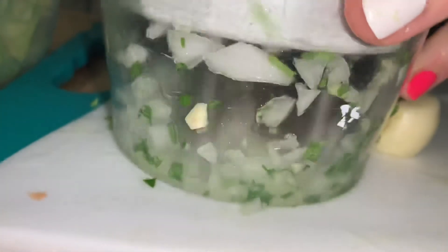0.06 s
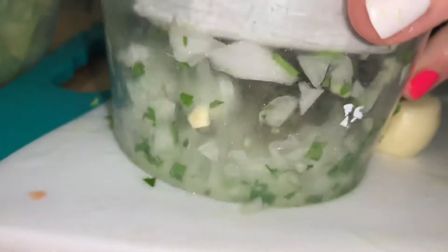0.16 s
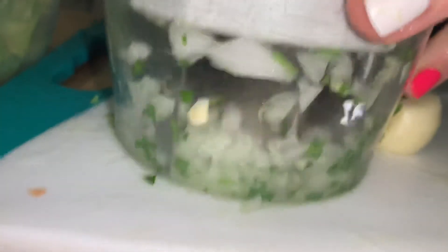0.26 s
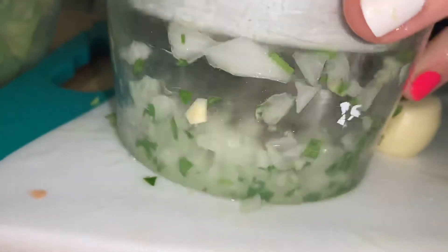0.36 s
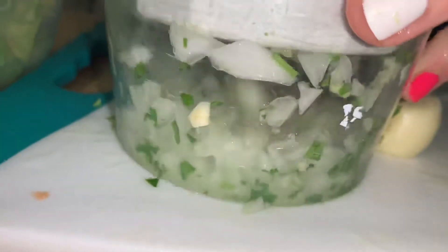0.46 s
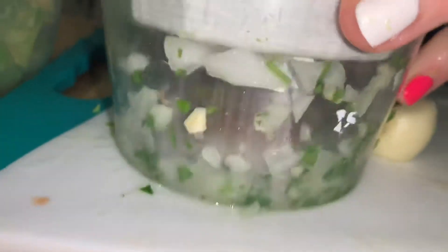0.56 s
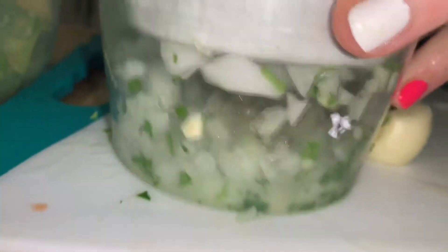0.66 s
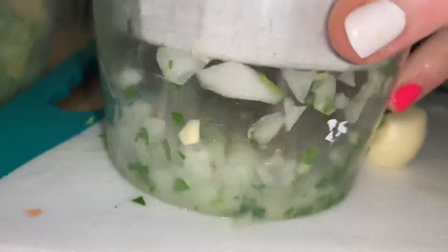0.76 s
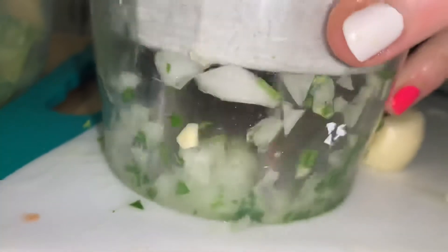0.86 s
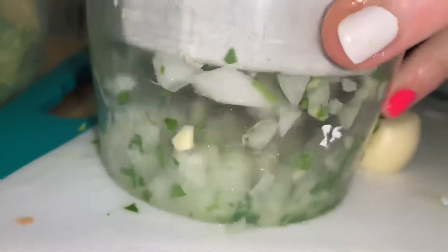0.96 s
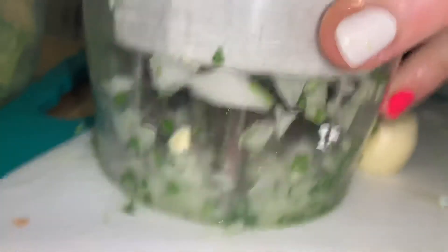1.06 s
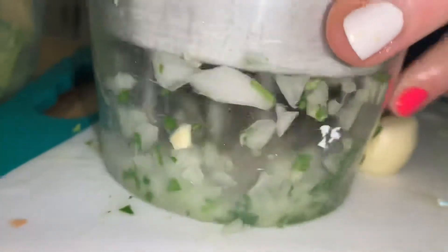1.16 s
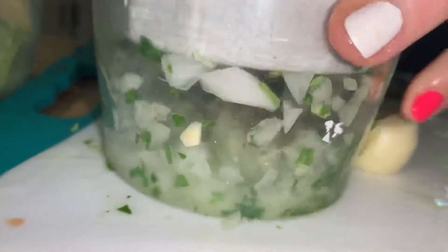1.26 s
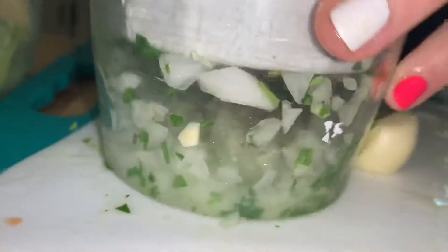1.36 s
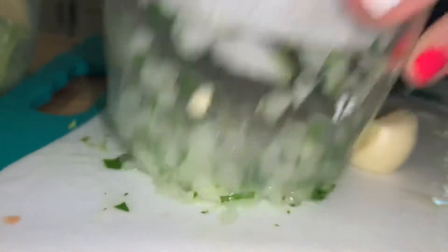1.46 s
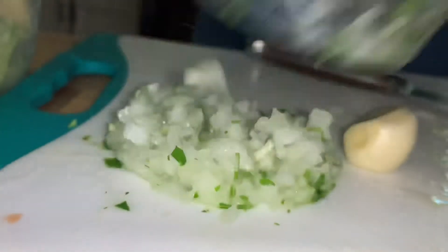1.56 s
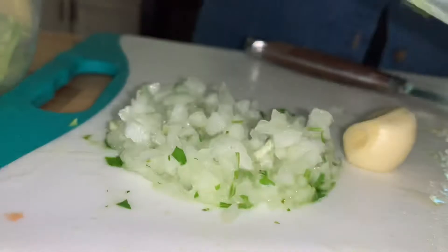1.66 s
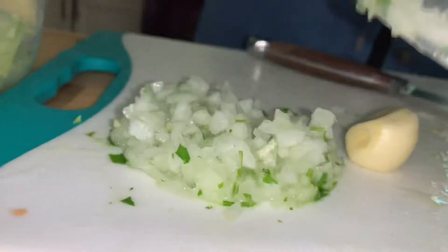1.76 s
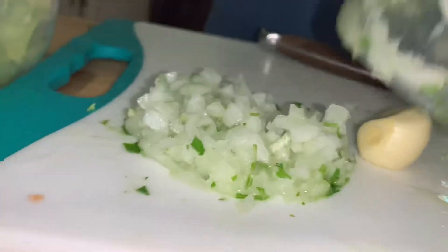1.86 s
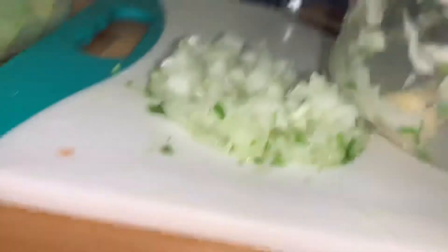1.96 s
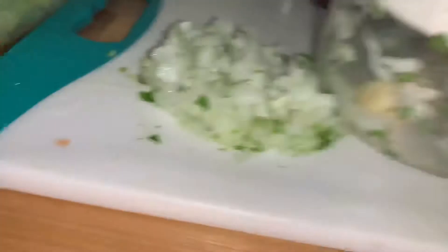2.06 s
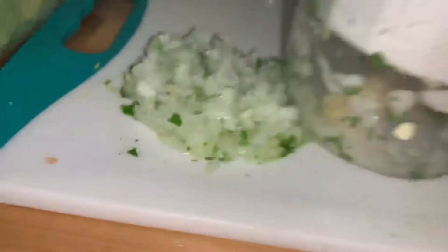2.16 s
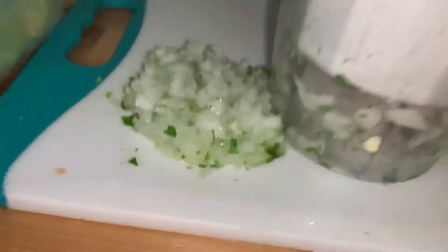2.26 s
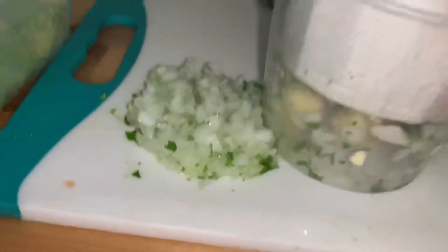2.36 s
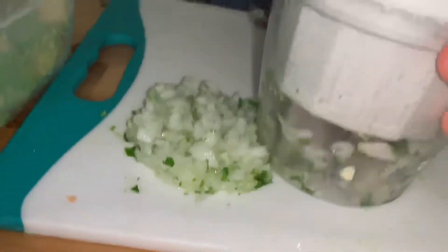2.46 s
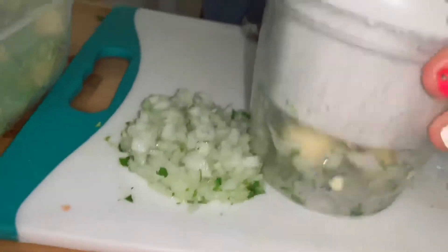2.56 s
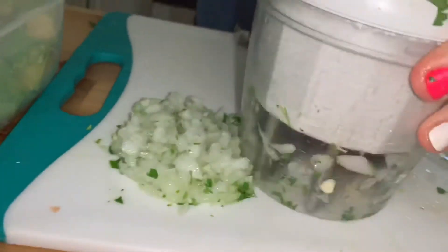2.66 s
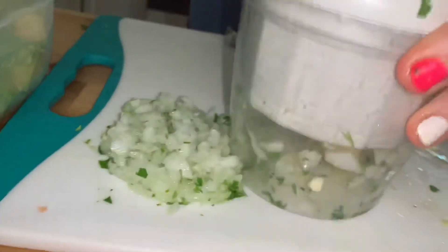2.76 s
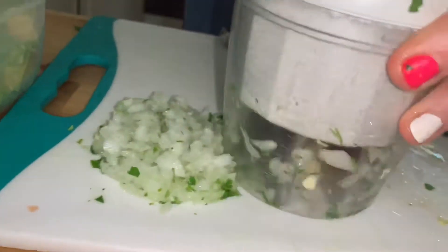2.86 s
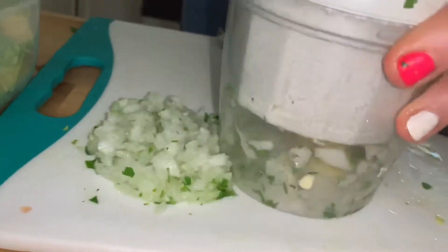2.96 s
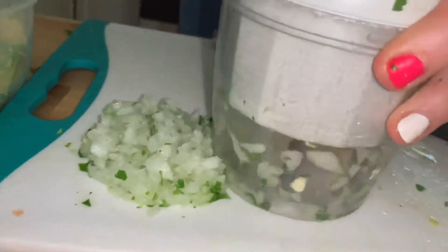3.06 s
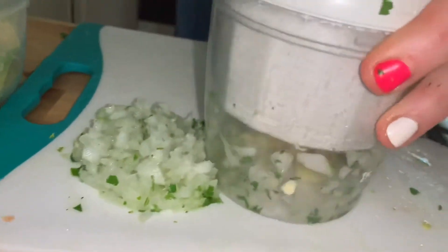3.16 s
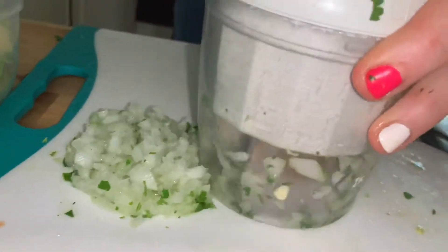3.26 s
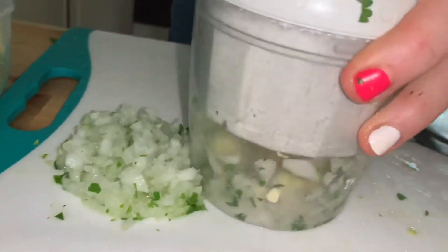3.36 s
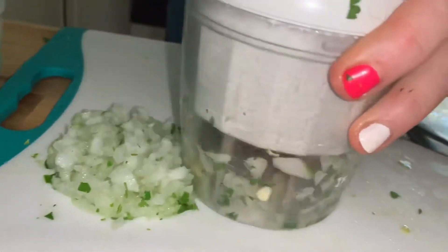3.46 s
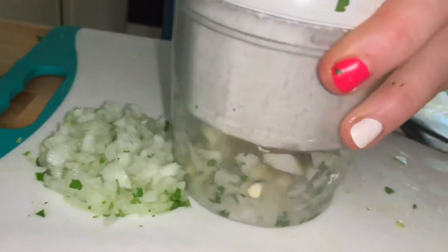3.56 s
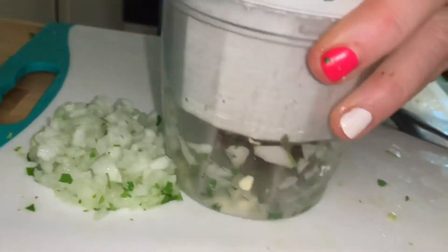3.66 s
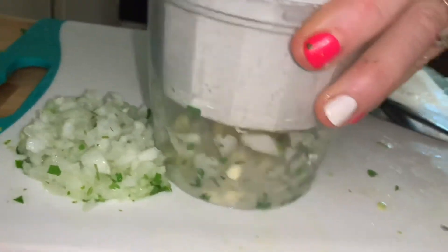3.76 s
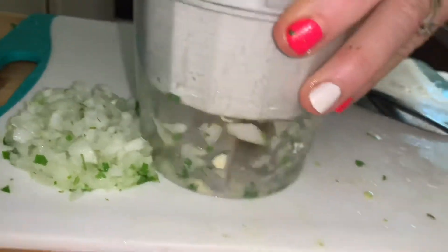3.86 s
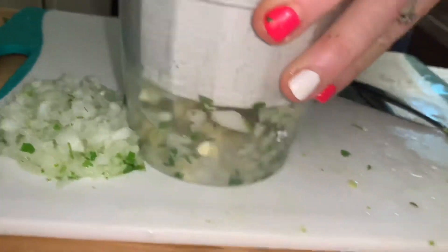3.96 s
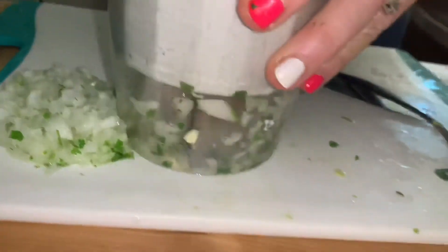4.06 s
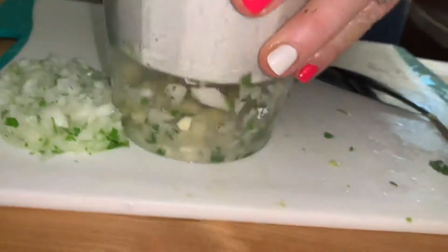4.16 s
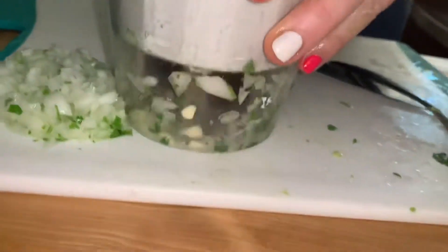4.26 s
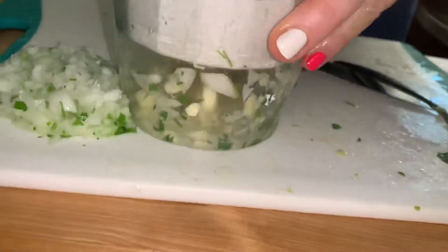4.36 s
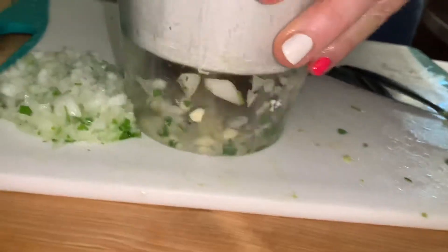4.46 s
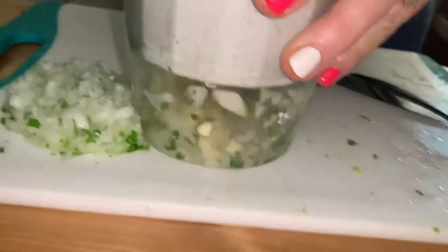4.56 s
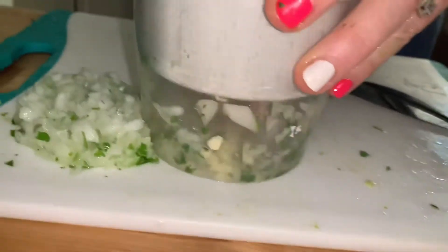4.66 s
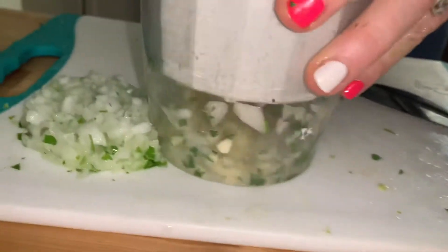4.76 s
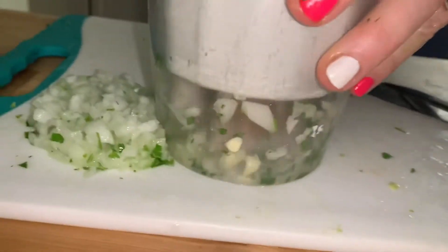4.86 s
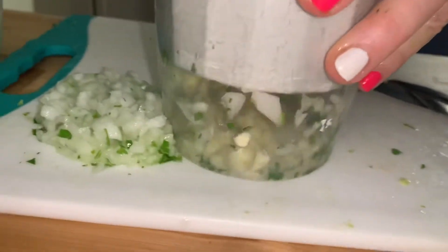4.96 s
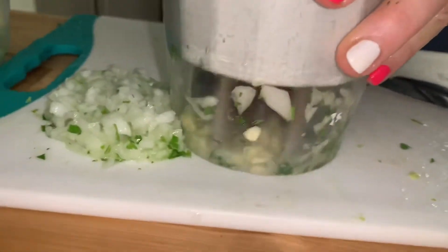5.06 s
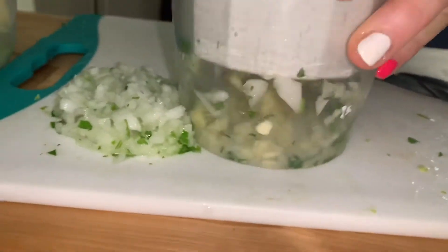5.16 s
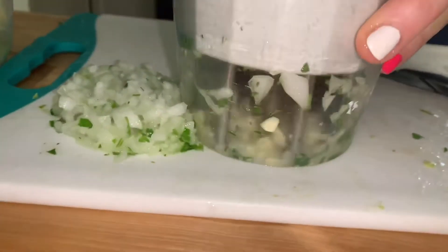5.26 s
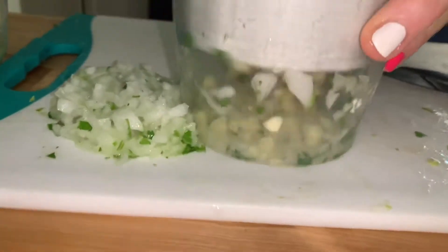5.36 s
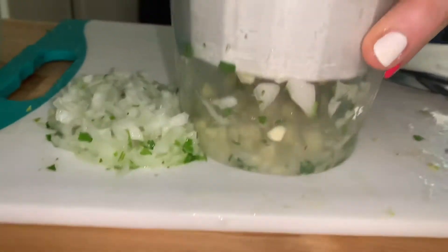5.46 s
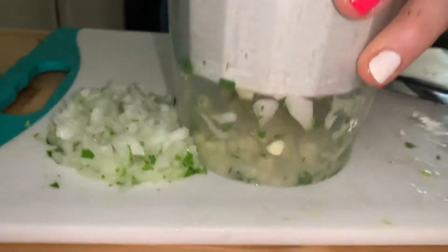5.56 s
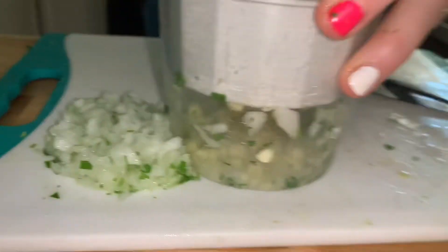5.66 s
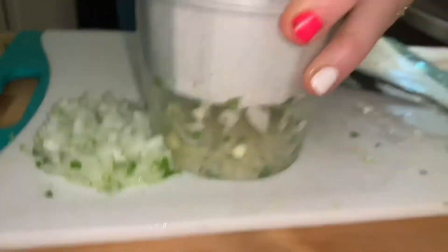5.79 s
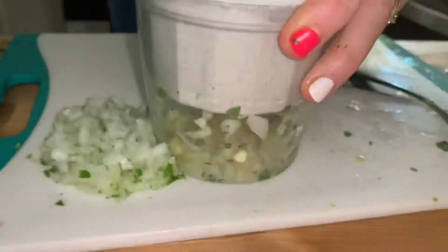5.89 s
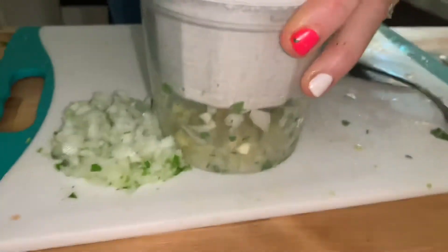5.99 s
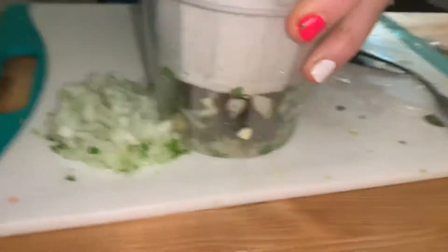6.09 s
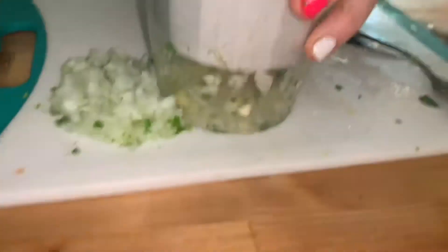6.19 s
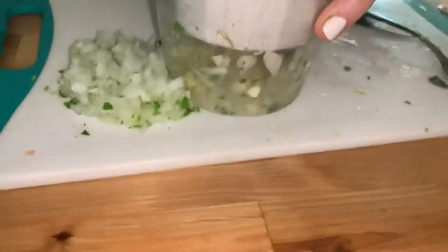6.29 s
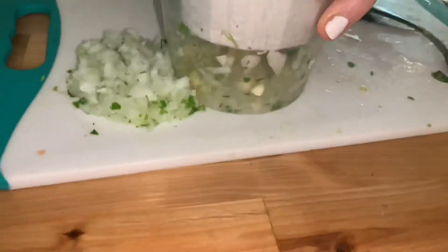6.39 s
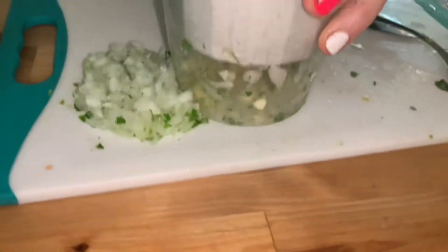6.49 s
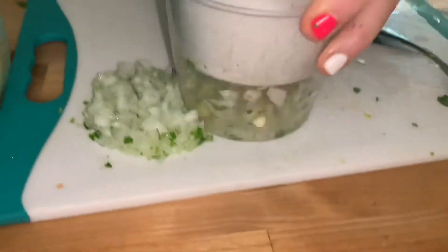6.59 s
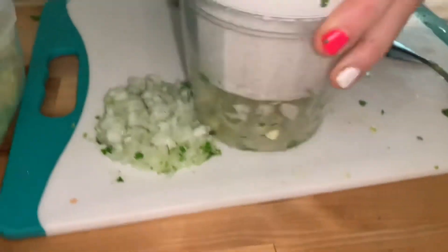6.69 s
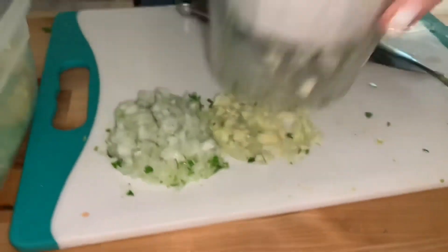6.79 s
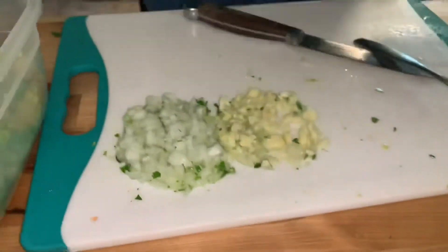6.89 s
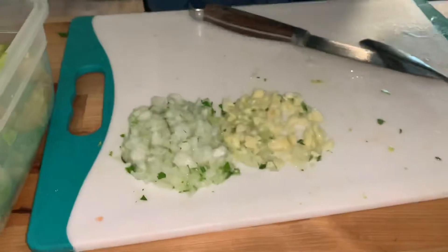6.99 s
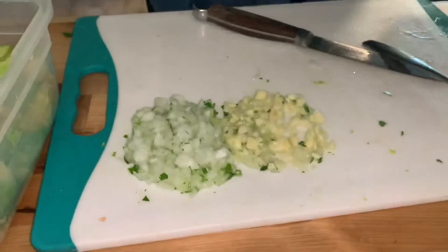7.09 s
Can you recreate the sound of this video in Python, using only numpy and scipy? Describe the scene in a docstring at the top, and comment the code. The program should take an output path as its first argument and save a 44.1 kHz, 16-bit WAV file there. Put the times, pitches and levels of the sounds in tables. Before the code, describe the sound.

A hand-pumped plastic chopper clacks and crunches on a cutting board, pauses for a knock, then pounds again in faster strokes in a small kitchen.

```python
"""In a small kitchen a plunger chopper is pumped on onion and garlic on a plastic cutting board, lifted,
set down and pumped again. Each stroke: two plunger ticks, a crunch of blades on the board with a table
thump, a wet scrape upwards, then a snap against the stop. Contacts are short noise forces that ring modal
plastic parts, thumps are sine waves of falling pitch, and the echo is a field of sparse reflections.
Faint room noise, table rumble and an appliance hum lie beneath; left and right differ in phase and level."""
import sys
import numpy as np
from scipy import signal
from scipy.fft import rfft, irfft, next_fast_len
from scipy.io import wavfile
from scipy.ndimage import uniform_filter1d

SR = 44100
rng = np.random.default_rng(int(sys.argv[2]) if len(sys.argv) > 2 else 0)


def unload_audio(sound):
    """Save the sound as a 16-bit wav file, at the path given as the first command line argument."""
    columns = np.transpose(np.atleast_2d(sound))
    # keep every value between -1 and 1, then stretch to whole-number steps
    steps = np.round(np.clip(columns, -1, 1) * 32767)
    wavfile.write(sys.argv[1], SR, steps.astype(np.int16))


N = 314433

# a contact is computed in a frame of SIZE samples, its force peaking LEAD seconds in
SIZE, LEAD = 4096, 512 / SR
TIME = np.arange(SIZE) / SR
BINS = np.fft.rfftfreq(SIZE, 1 / SR)

# blades hit the board: t/s, level/dB, downstroke length/s, dullness/dB (+ a low knock, - a hollow clack)
CHOPS = [(0.215, 6.5, .0247, 3), (0.4882, 5.6, .0211, -2), (0.7518, 7.3, .0214, 2.5),
         (1.0179, 5.3, 0.021, -12.5), (2.2256, 10.3, .0251, -1), (2.447, 10.9, 0.03, -17.5),
         (2.636, 11.5, 0.018, 3.5), (2.831, 11.4, 0.019, 7.5), (3.0262, 11.4, .024, 4),
         (3.2298, 12.9, .0256, -9.5), (3.4131, 9.2, .026, -12.5), (3.618, 11.8, .0277, 6.5),
         (3.8121, 9, .0251, 2), (4.0097, 9.1, 0.02, 3.5), (4.2013, 10.1, .0242, 8.5),
         (4.3846, 10, 0.021, 7.5), (4.5745, 12.1, 0.023, -9), (4.767, 9.6, .025, -9.5),
         (4.9897, 10, .0275, -8), (5.2185, 9, 0.023, 6), (5.6652, 11.4, 0.023, 4),
         (6.0721, 10, 0.024, -1.5), (6.5112, 10, .026, 1)]
# plunger snaps back to its stop: t/s, level/dB
RETURNS = [(0.086, 8.5), (0.36, 8), (0.633, 8.5), (0.893, 5), (1.182, 5.5), (2.306, 4), (2.533, 6.5),
           (2.729, 4.5), (2.923, 5), (3.122, 4), (3.321, 6.5), (3.528, 2.5), (3.713, 1), (3.909, 3.5),
           (4.099, -3), (4.287, 1.5), (4.476, 3), (4.67, 6), (4.88, 1), (5.095, 3.5), (5.336, 3),
           (5.732, 1), (6.138, 3), (6.577, 4.5)]
# drag of the load on the returning blades: t/s, factor on the length of the snap
DRAG = [(.6, 1.14), (.9, 1.4), (1.2, 1), (5.3, 1.13), (5.8, 1)]
# spectrum of blades on board: f/Hz, level/dB
CHOP_COLOUR = [(60, -6.5), (250, -7.5), (450, -5), (700, -4.5), (1000, -7.5), (1500, -9), (2000, -10),
               (2800, -17), (4000, -16.5), (6000, -22.5), (8500, -26), (11000, -24.5), (15000, -35.5)]
# spectrum of a plunger tick: f/Hz, level/dB
TICK_COLOUR = [(60, -24.5), (250, -4), (450, -4), (700, -13), (1000, -2), (1500, -18.5), (2000, -12.5),
               (2800, -13), (4000, -12.5), (6000, -21), (8500, -17.5), (11000, -16.5), (15000, -23.5)]
# resonances of the cup pressed on the board: f/Hz, width/Hz, lift/dB
BOARD_MODES = [(306, 14, 9), (477, 25, 7.5), (1010, 49, 0.5), (1223, 29, 3.5), (1456, 7.2, 6),
               (1570, 42, 5.5), (1980, 16, -0.5), (2120, 36, 1.5), (2170, 36, -0.1), (3003, 25, 6.5),
               (3470, 21, -3), (4700, 45, 0)]


def gain_of(db):
    """Decibel law: 20 dB is a factor of ten in amplitude."""
    return 10 ** (np.asarray(db) / 20)


def read(points, hz):
    """Spectral interpolation: joins (f/Hz, value) points on a log-frequency axis."""
    f, value = np.transpose(points)
    return np.interp(np.log(hz + 1), np.log(f + 1), value)


def at(points, s):
    """Linear interpolation: the value of (t/s, value) points at time s."""
    return np.interp(s, *np.transpose(points))


def curve(points):
    """Envelope: joins (t/s, value) points, sample by sample."""
    return at(points, np.arange(N) / SR)


def add(mix, s, sound):
    """Superposition: mixes a sound in at time s."""
    part = mix[..., max(round(s * SR), 0):][..., :sound.shape[-1]]
    part += sound[..., :part.shape[-1]]


def causal(db):
    """Minimum phase: the Hilbert transform of the log gain makes a response that rings only after the blow."""
    log_gain = np.log(gain_of(np.r_[db, db[-2:0:-1]]))
    return np.exp(np.conj(signal.hilbert(log_gain)))[:len(db)]


def noise(colour):
    """Filtered white noise: two independent channels with a given spectrum and unit rms."""
    size = 2 ** 19
    white = rng.standard_normal((2, size))
    gain = gain_of(read(colour, np.fft.rfftfreq(size, 1 / SR)))
    x = irfft(rfft(white) * gain)[:, :N]
    return x / x.std()


def stick_slip(hold):
    """Stick-slip friction: a random level that jumps every `hold` samples."""
    return np.exp(.6 * np.repeat(rng.standard_normal(N // hold + 1), hold)[:N])


def cluster(rise, fall, grit):
    """Shot noise: spectrum of a cluster of tiny impacts that swells and dies within milliseconds."""
    swell = np.exp(np.minimum((TIME - LEAD) / rise, (LEAD - TIME) / fall))
    grains = np.repeat(np.exp(grit * np.minimum(rng.standard_normal(SIZE // 16), 1.7)), 16)
    force = rfft(rng.standard_normal((2, SIZE)) * swell * grains)
    smooth_power = uniform_filter1d(abs(force) ** 2, size=81, axis=1)
    return force / np.sqrt(smooth_power)  # flat on average


def rattle(db, corner_hz, rise, fall):
    """Repeated impact: loose parts and crushed pieces chatter around a blow, rolled off above a corner."""
    return gain_of(db) * cluster(rise, fall, grit=0.75) / (1 + 1j * BINS / corner_hz)


def body(modes):
    """Modal response of a plastic part: the direct contact plus exponentially damped cosines."""
    ring = np.zeros(SIZE)
    for hz, width, db in modes:
        strength = (gain_of(db) - 1) * 2 * np.pi * width / SR
        ring += strength * np.exp(-np.pi * width * TIME) * np.cos(2 * np.pi * hz * TIME)
    return 1 + rfft(ring)


def contact(force, response, colour, low_db, mid_db, treble_db):
    """Source-filter principle: a force rings a part, scaled to unit energy over 1.5-5 kHz."""
    tilt = read([(30, -15), (130, 0), (400, low_db), (550, low_db), (1000, mid_db),
                 (1900, 0), (4000, 0), (7000, treble_db)], BINS)
    # no two contacts meet at quite the same spot, so their colour wanders by 2 dB
    wander = 2 * read(np.c_[np.geomspace(300, 12000, 12), rng.standard_normal(12)], BINS)
    sound = force * response * causal(read(colour, BINS) + tilt + wander)
    presence = (BINS > 1500) & (BINS < 5000)
    energy = np.sum(abs(sound[:, presence]) ** 2) / SIZE
    return irfft(sound) / np.sqrt(energy)


def thump(hz, sweep_hz, sweep_time, hold, onset):
    """Dispersion of bending waves in the table: high ones arrive first, then the pitch settles and dies."""
    pitch = hz * (1 + 0.015 * rng.standard_normal()) + sweep_hz * np.exp(-TIME / sweep_time)
    swing = (1 - np.exp(-TIME / onset)) / (1 + (TIME / hold) ** 5.2)
    wave = -np.sin(2 * np.pi * np.cumsum(pitch) / SR) * swing
    return wave / np.linalg.norm(wave)


def push(length):
    """Damped displacement: the whole table gives way once under the hand and comes back."""
    u = TIME / length
    wave = u * (2 - u) * np.exp(-u)
    return -wave / np.linalg.norm(wave)


def hum():
    """Periodic source: the steady sine of an appliance, its level following a slow curve."""
    # t/s, rms level/dB
    hum_level = [(0, -65), (1.75, -65), (6.9, -75)]
    return np.sqrt(2) * gain_of(curve(hum_level)) * np.sin(2 * np.pi * 118.4 * np.arange(N) / SR)


def rumble():
    """Forced vibration: the table rumbles through each bout of pumping and settles after it."""
    # spectrum of the rumble: f/Hz, relative level/dB
    rumble_colour = [(20, -19.5), (45, -6.5), (68, 3.5), (90, -5), (160, -5), (300, -24), (800, -50.5)]
    # the hand bears down on the chopper: start t/s, end t/s, level/dB
    bouts = [(0, 1.186, -42), (2.251, 5.262, -47)]
    rise, fall, rest_db = 77, 109, -78.5  # dB/s, dB/s, dB
    t = np.arange(N) / SR
    level = gain_of(rest_db)
    for start, end, db in bouts:
        before, after = np.maximum(start - t, 0), np.maximum(t - end, 0)
        level = level + gain_of(db - rise * before - fall * after)
    return noise(rumble_colour) * level


def air():
    """Diffuse background: faint room noise, table rumble, and the dying echo of the stroke before."""
    # spectrum of the room noise: f/Hz, relative level/dB
    air_colour = [(25, -17.5), (60, 5.5), (120, 0), (200, -10), (400, -15), (1000, -22.5), (3000, -28),
                  (8000, -35.5), (15000, -49)]
    # t/s, level/dB
    air_level = [(0, -68), (1.7, -83), (6.9, -81.5)]
    echo = noise(CHOP_COLOUR) * gain_of(curve([(0, -39), (.5, -88.5)]))
    return noise(air_colour) * gain_of(curve(air_level)) + rumble() + echo


def room_tail():
    """Reverberation: sparse reflections of random sign, each band dying at its own speed."""
    # f/Hz, time to decay by 60 dB/s
    decay_times = [(100, 0.73), (260, .5), (700, 0.52), (1800, .5), (4800, 0.4449), (12800, 0.38)]
    t = np.arange(SR) / SR
    sign = rng.choice([-1., 1.], (2, SR))
    present = rng.random((2, SR)) < 4000 / SR  # 4000 reflections per second
    taps = sign * present * np.clip(t / 0.009, 0, 1)
    hz, frame_t, z = signal.stft(taps, SR, nperseg=256)
    t60 = read(decay_times, hz)[:, None]
    # dividing by the root of t60 gives long and short bands equal energy
    tail = signal.istft(z * gain_of(-60 * frame_t / t60) / np.sqrt(t60), SR, nperseg=256)[1][:, :SR]
    return tail * np.sqrt(2 * np.log(1000) / np.sum(taps[0] ** 2))


def kitchen(x, count=4):
    """Convolution with a room: successive strokes meet different reflections, taking the tails in turn."""
    # spectrum of the echo: f/Hz, level/dB
    room_colour = [(40, -23.5), (65, -3), (110, -14.5), (200, -13), (450, -12.5), (1000, -12), (2000, -10),
                   (5000, -14), (10000, -21.5), (15000, -25.5)]
    colour = causal(read(room_colour, np.fft.rfftfreq(SR, 1 / SR)))
    tails = [irfft(rfft(room_tail()) * colour) for _ in range(count)]
    edges = [0] + [round(row[0] * SR) - SIZE // 2 for row in CHOPS] + [N]
    echo = np.zeros((2, N))
    for k, (start, end) in enumerate(zip(edges, edges[1:])):
        add(echo, start / SR, signal.fftconvolve(x[:, start:end], tails[k % count], axes=1))
    return echo


def stereo_width(x):
    """Stereo width: left and right share sound and differ in phase and level with frequency."""
    # f/Hz, likeness of left and right (clipped to 0-1)
    likeness = [(50, 2.4), (130, 0.5), (170, 1), (350, 0.62), (600, 0.5), (1000, 0.25), (2500, 0),
                (6000, 0), (7000, 1.63), (15000, -0.1)]
    # f/Hz, phase lag of the right channel/rad
    phase_lag = [(150, .1), (500, 0.36), (1000, 1.4), (2200, 3.5), (4000, 0.93), (7000, 1.33), (8700, 3.06),
                 (11000, 6.5), (13600, 14), (15500, 8.6)]
    # f/Hz, left minus right level/dB
    balance = [(150, -2), (500, 1), (1400, 2), (2500, 0), (4800, -5), (8000, -1.5), (15000, -2.5)]
    size = next_fast_len(N + SIZE)
    hz = np.fft.rfftfreq(size, 1 / SR)
    left, other = rfft(x, size)
    same = np.clip(read(likeness, hz), 0, 1)
    right = same * left + np.sqrt(1 - same ** 2) * other
    right = right * np.exp(-1j * read(phase_lag, hz))
    lean = gain_of(read(balance, hz) / 2)
    return irfft(np.array([left * lean, right / lean]), size)[:, :N]


def handling():
    """Impact and friction: the cup is rocked, lifted off the heap, set down on the garlic and slid into place."""
    # knocks of the cup: t/s, level/dB, brightness/dB, table thump level/dB
    knocks = [(1.1389, -21.5, -6, -22.5), (1.2009, -5.5, 0, -18), (1.411, -46, 23, -39),
              (1.631, -49.5, -17, -52), (1.851, -39, 0.5, -23.5), (1.9597, -5, -4.5, 2.5),
              (1.9856, -24, -1, -11.5), (2.046, -40.5, 19.5, -34), (2.1008, -35, 19.5, -27),
              (7.09, -32, 14.5, -46)]
    # the hand leans on the chopper and nudges the table: t/s, level/dB
    nudges = [(1.877, -26.5), (6.439, -19.5), (6.452, -26)]
    # the wet cup slides over the pieces: t/s, level/dB
    slide_level = [(1.95, -101.5), (1.975, -36), (2.0, -57.5), (2.04, -68), (2.1, -72.5), (2.19, -55),
                   (2.22, -87)]
    # the lifted cup rings freely: f/Hz, width/Hz, lift/dB
    cup_modes = [(478, 50, 7), (2385, 70, 15), (2580, 79, 18.5), (3850, 60, 10), (4250, 60, 13.5)]
    clatter, table = np.zeros((2, N)), np.zeros(N)
    board, cup = body(BOARD_MODES), body(cup_modes)
    for s, db, bright, thump_db in knocks:
        force = cluster(rise=0.0008, fall=0.002, grit=0.6)
        force = force + rattle(db=-11, corner_hz=4000, rise=.001, fall=0.011)
        full = -0.45 * bright  # dB: a brighter knock has less body
        knock = contact(force, board, CHOP_COLOUR, 4 + full, -1 + full, -2.5 + bright)
        add(clatter, s - LEAD, gain_of(db) * knock)
        # the cup chatters and rings on after each knock, 5.5 dB below it
        chatter = contact(cluster(rise=0.0022, fall=.022, grit=.7), cup, CHOP_COLOUR, full, full, bright)
        add(clatter, s - LEAD, gain_of(db - 5.5) * chatter)
        boom = thump(hz=147, sweep_hz=900, sweep_time=0.00037, hold=0.015, onset=0.0017)
        add(table, s + 0.0016, gain_of(thump_db) * boom)
    for s, thump_db in nudges:
        nudge = thump(hz=95, sweep_hz=80, sweep_time=.003, hold=.02, onset=.004)
        add(table, s, gain_of(thump_db) * nudge)
    slips = stick_slip(hold=128)
    slide = noise(CHOP_COLOUR) * slips * gain_of(curve(slide_level))
    return clatter + slide, table


def pieces():
    """Friction and adhesion: rising blades scrape the wet pieces, which come unstuck in a bright crackle."""
    # spectrum of the scrape: f/Hz, relative level/dB
    scrape_colour = [(100, -15.5), (400, 8), (1200, 4), (3000, -2.5), (6000, -8), (11000, -14),
                     (15000, -18.5)]
    squelch_db, squelch_per_drag = -25, 7  # dB, dB per unit of extra drag
    scrape_db, scrape_per_drag = -45.5, -7.5
    clatter, scraping = np.zeros((2, N)), np.zeros(N)
    for (landing, *_), (snap, _) in zip(CHOPS, RETURNS[1:]):
        extra_drag, length = at(DRAG, snap) - 1, snap - landing
        force = cluster(rise=.002, fall=0.024, grit=0.9)
        squelch = contact(force, 1, TICK_COLOUR, low_db=-1.5, mid_db=-3.5, treble_db=1.0)
        pull_free = landing + .66 * length  # two thirds of the way up
        add(clatter, pull_free - LEAD, gain_of(squelch_db + squelch_per_drag * extra_drag) * squelch)
        stroke = signal.windows.tukey(round(length * SR), .1)
        add(scraping, landing, gain_of(scrape_db + scrape_per_drag * extra_drag) * stroke)
    slips = stick_slip(hold=64)
    return clatter + noise(scrape_colour) * slips * scraping


def plunger():
    """Impact of a sprung mass: two ticks on the way down, a snap and bounce at the stop, a jolt of the table."""
    # resonances of the free housing: f/Hz, width/Hz, lift/dB
    housing_modes = [(320, 75, 8.6), (620, 120, 6.7), (630, 57, 1.2), (1444, 68, 12), (1594, 44, 10),
                     (1680, 86, 6.4), (2250, 12, 5.8), (2255, 15, 0.87), (3100, 18, 1.7), (4100, 45, 3.3),
                     (3960, 19, 2), (4220, 62, 3.1)]
    # spectrum of the snap: f/Hz, level/dB
    return_colour = [(60, -11.5), (250, -5.5), (450, -1.5), (700, -3.5), (1000, 0), (1500, -13.5),
                     (2000, -7.5), (2800, -8), (4000, -8.5), (6000, -10.5), (8500, -13), (11000, -10.5),
                     (15000, -24)]
    # firm pieces make louder, brighter ticks, most while the garlic is whole: t/s, tick level/dB
    firmness = [(.2, 3.5), (1.0, 0.5), (2.3, 7), (2.8, 0.5), (3.9, 0.5), (5.2, -2), (5.7, 1), (6.5, -2.5)]
    clatter, table = np.zeros((2, N)), np.zeros(N)
    housing = body(housing_modes)
    for landing, _, travel, _ in CHOPS:
        firm = at(firmness, landing)
        # the plunger engages, then the blades turn into the pieces: s before landing, level dB, treble dB
        for early, db, treble in [(travel, -9.5, 3.5), (travel * 0.45, -10, 5)]:
            s, size = landing - early, gain_of(db + firm)
            force = cluster(rise=0.0005, fall=0.0015, grit=0.29)
            force = force + rattle(db=5.5, corner_hz=4000, rise=0.00085, fall=0.022)
            tick = contact(force, housing, TICK_COLOUR, 0, 0, treble + .6 * firm)
            add(clatter, s - LEAD, size * tick)
            boom = thump(hz=165, sweep_hz=930, sweep_time=0.0012, hold=0.015, onset=0.0017)
            add(table, s + 0.0035, size * gain_of(4.5) * boom)
    for s, db in RETURNS:
        drag = at(DRAG, s)
        force = cluster(rise=0.0011 * drag, fall=0.0015 * drag, grit=0.53)
        force = force + rattle(db=-2.0, corner_hz=5100, rise=0.0011, fall=0.0097)
        # low, mid and treble in dB: a dragging load muffles the snap and makes it knock
        tone = 0, -1.5 + 7 * (drag - 1), 1 - 11 * (drag - 1)
        add(clatter, s - LEAD - .0004, gain_of(db) * contact(force, housing, return_colour, *tone))
        rebound = contact(cluster(rise=0.0042, fall=0.0039, grit=0.93), housing, return_colour, *tone)
        add(clatter, s + 0.0053 - LEAD, gain_of(db - 14) * rebound)  # one bounce, 5.3 ms later
        jolt = gain_of(db - 5 + 7 * (drag - 1.5))  # harder when the load drags
        boom = thump(hz=142, sweep_hz=302, sweep_time=.002, hold=0.011, onset=.005)
        add(table, s + .009, jolt * boom)
    return clatter, table


def blades():
    """Impact on a plate: blades crunch through the pieces onto the board, and the table takes the blow."""
    # weight of each stroke on the table: t/s, change in thump level/dB
    weight = [(.5, -1), (2.3, 1), (5.2, 0.5), (6.0, -0.5)]
    clatter, table = np.zeros((2, N)), np.zeros(N)
    # bending waves in the board arrive later the lower they are: 0.903 ms at 680 Hz
    bend_delay, bend_hz = 0.000903, 680
    bending = np.exp(-2j * np.pi * 2 * bend_delay * np.sqrt(bend_hz * BINS))
    board = body(BOARD_MODES) * bending
    for s, db, _, dull in CHOPS:
        force = cluster(rise=0.0011, fall=0.0013, grit=0.55)
        force = force + rattle(db=0.5, corner_hz=3180, rise=0.0025, fall=0.011)
        # a duller chop has less 1 kHz
        knock = contact(force, board, CHOP_COLOUR, low_db=-10.5, mid_db=-2 - 0.38 * dull, treble_db=2)
        add(clatter, s - LEAD - .0004, gain_of(db) * knock)
        boom = thump(hz=156.5, sweep_hz=1210, sweep_time=.00085, hold=.013, onset=0.0024)
        boom = boom + gain_of(-23.5) * push(length=0.0038)
        # a duller chop slams the board flat on the table
        slam = thump(hz=158, sweep_hz=780, sweep_time=.0013, hold=0.0021, onset=.0012)
        add(table, s + .0011, gain_of(6 + 0.82 * dull) * slam)
        add(table, s + 0.0013, gain_of(14 + at(weight, s)) * boom)
    return clatter, table


def scene():
    """Direct and reverberant field: clatter and table thumps in the kitchen, over a faint hum."""
    # slow drift of the stereo balance: t/s, left minus right level/dB
    drift = [(.6, 2.9), (2.3, 0.9), (4.2, 2.3), (5.6, 1.8), (6.3, 0.64)]
    clatter, table = (sum(parts) for parts in zip(blades(), plunger(), handling()))
    clatter = clatter + pieces()
    near = stereo_width(clatter + kitchen(clatter + table) + air()) + table
    return near * gain_of(np.outer([.5, -.5], curve(drift))) + hum()


def record(dry):
    """Output shaping: a gentle bass cut, soft limiting of loud peaks, and a low-pass at 16.1 kHz."""
    dry = signal.sosfilt(signal.butter(1, 22, "highpass", fs=SR, output="sos"), dry)
    rounded = dry / (1 + (dry / .92) ** 6) ** (1 / 6)
    lowpass = signal.firwin(201, 16100, window=("kaiser", 9), fs=SR)
    return signal.oaconvolve(rounded, lowpass[None], "same")


dry = scene()
out = record(dry)
unload_audio(out)
```